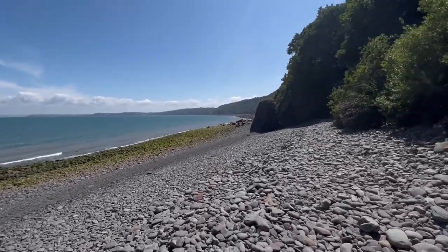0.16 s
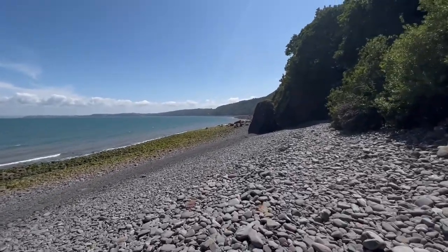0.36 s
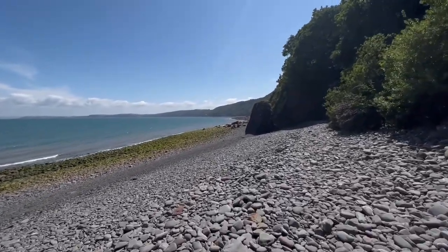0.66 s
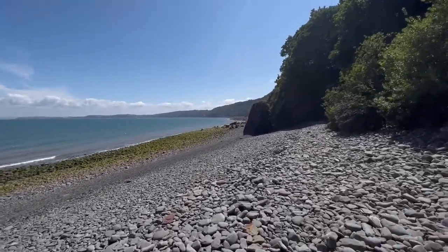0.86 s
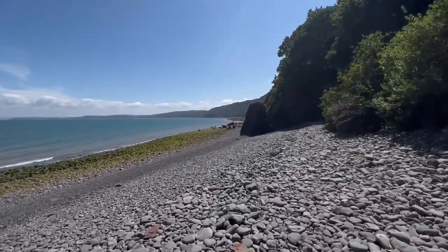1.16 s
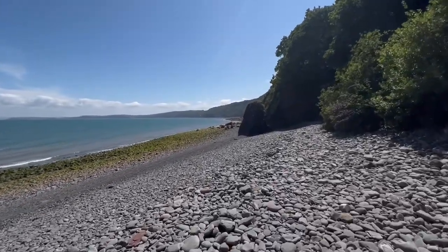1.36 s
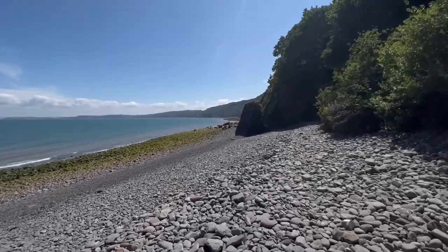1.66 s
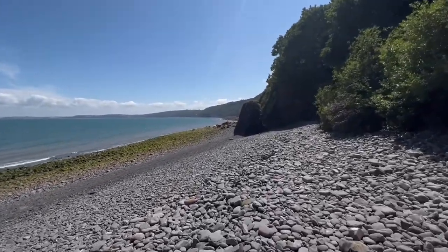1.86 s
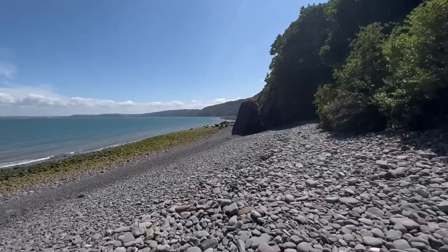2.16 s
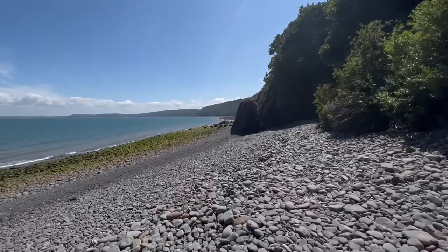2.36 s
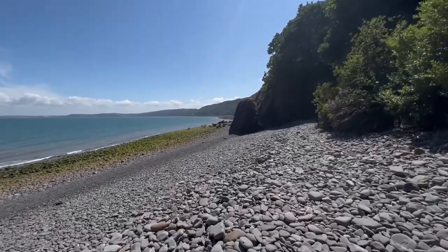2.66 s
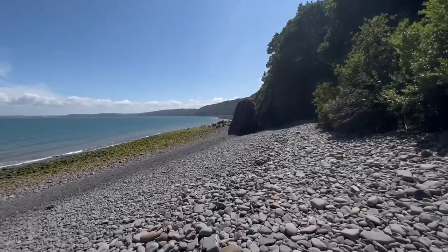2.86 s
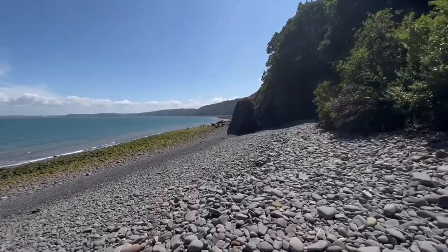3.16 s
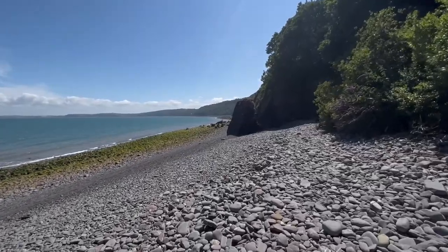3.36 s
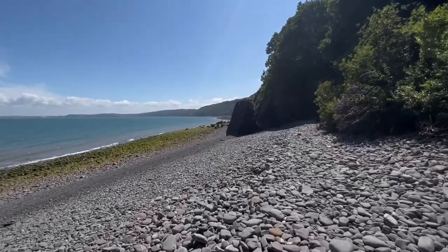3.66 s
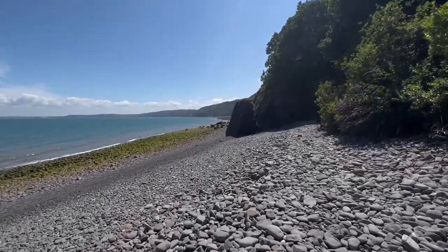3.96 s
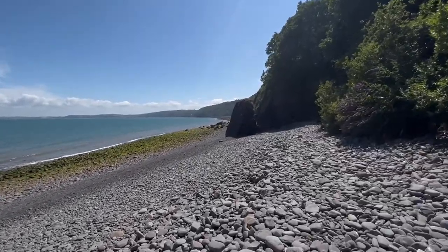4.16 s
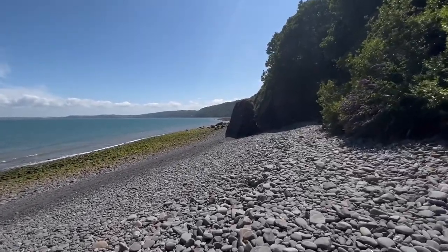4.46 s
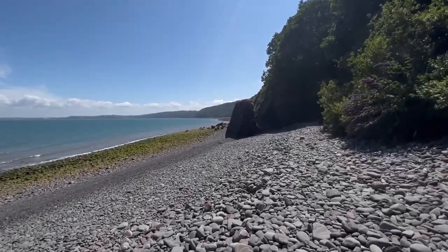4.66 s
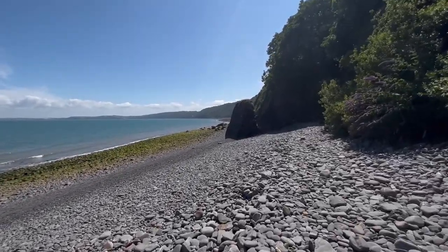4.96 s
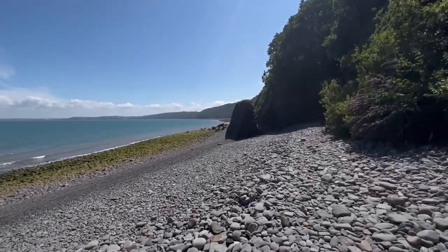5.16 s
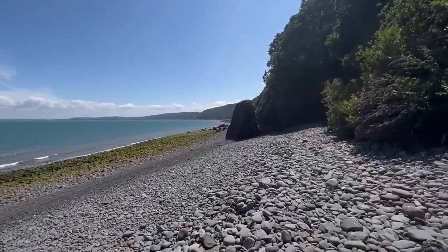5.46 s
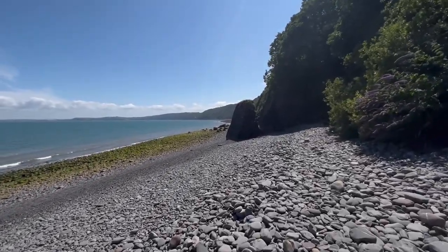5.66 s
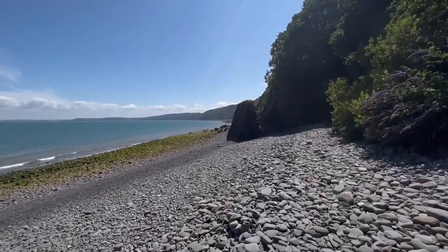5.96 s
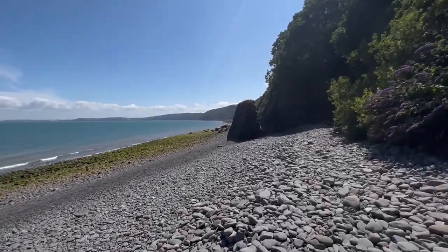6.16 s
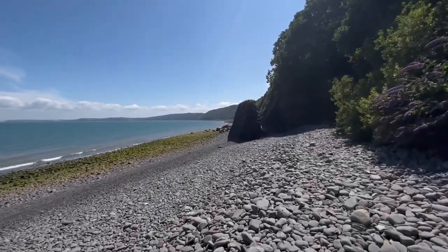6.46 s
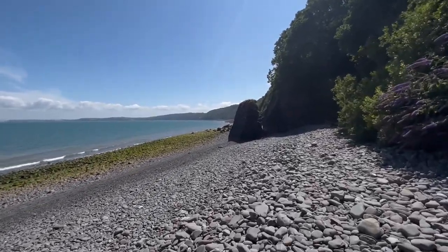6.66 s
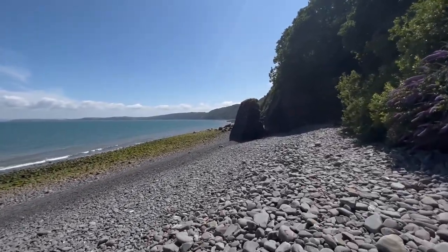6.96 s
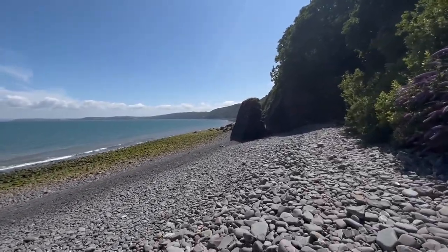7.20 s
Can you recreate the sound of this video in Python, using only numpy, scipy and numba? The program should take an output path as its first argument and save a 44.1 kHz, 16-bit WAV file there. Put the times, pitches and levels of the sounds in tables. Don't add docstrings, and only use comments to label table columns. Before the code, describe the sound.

A walker crosses an open cobble beach with a handheld microphone. Irregular clusters of hard, dry stone knocks mark each step, some bright and cracking, others dull and hollow, with little ticks and rattles between. A faint, steady sea hiss leans left and rises gently after four seconds. Gusty low-frequency wind rumbles and thumps the microphone, stronger in the second half.

```python
import sys
import numpy as np
from scipy import signal
from scipy.fft import rfft, irfft
from scipy.io import wavfile
from scipy.ndimage import uniform_filter1d
from numba import njit

SR = 44100
rng = np.random.default_rng(int(sys.argv[2]) if len(sys.argv) > 2 else 0)


def gain_from_db(level_db):
    decades = np.asarray(level_db, float) / 20
    return 10 ** decades


def output_pcm(signal):
    pcm = np.clip(np.atleast_2d(signal).T, -1, 1) * 32767
    wavfile.write(sys.argv[1], SR, np.round(pcm).astype(np.int16))


N = 323253

RIGHT_TREBLE_HZ = 8500


def along(table, hz):
    f, v = np.transpose(table)
    return np.interp(np.log(np.maximum(hz, 1)), np.log(f), v)


def curve(rows):
    s, *columns = np.transpose(rows)
    return [np.interp(np.arange(N) / SR, s, c) for c in columns]


def walk(rate_hz):
    hold = int(SR / rate_hz)
    steps = np.repeat(rng.standard_normal(N // hold + 1), hold)
    return 1.85 * uniform_filter1d(uniform_filter1d(steps, hold), hold)[:N]


def noise_bands(edges_hz, table, likeness, lag_ms, turn=0.):
    f = np.arange(N // 2 + 1) * SR / N
    left, other = rfft(rng.standard_normal((2, N))) * gain_from_db(along(table, f))
    like = likeness(f)
    lagged = left * np.exp(-2j * np.pi * f * lag_ms / 1000 - 1j * turn)
    right = like * lagged + np.sqrt(1 - like ** 2) * other
    for lo, hi in zip(edges_hz, edges_hz[1:]):
        in_band = (f >= lo) & (f < hi)
        yield np.sqrt(lo * hi), irfft(np.array([left, right]) * in_band, N)


def sea():
    # time in seconds, level in dB.
    wash = [(0.0, -38), (0.61, -41), (1.22, -40), (1.83, -42), (2.44, -40.5), (3.05, -39.5), (3.66, -37.5),
            (4.27, -36.5), (4.88, -33.5), (5.49, -33.5), (6.1, -33), (6.71, -36), (7.32, -37.5)]
    # frequency in Hz, density in dB per Hz.
    colour = [(150, -1), (250, -10.5), (543, -7), (841, 3), (1120, -3.5), (1470, -3), (1650, -6),
              (2830, -6.5), (4230, -11.5), (5730, -11), (9000, -19.5), (11400, -28), (12600, -30),
              (13700, -32), (15100, -26)]
    # frequency in Hz, left minus right in dB.
    balance = [(250, 2.5), (800, 5.), (2400, 4.5), (4400, 9.), (7500, 10.), (11000, 1.)]
    # frequency in Hz, correlation 0-1.
    alike = [(250, 0.43), (800, 0.97), (1800, 0.07), (3000, 0), (8000, 0.1), (11000, 0.44)]
    wash_db, = curve(wash)
    nearing_db = 0.58 * (np.arange(N) - N / 2) / SR
    fizz_db = -52.5 + 0.6 * (wash_db + 40) + nearing_db
    swell = walk(0.94)
    edges_hz = 200 * 2 ** np.arange(0, 6.6, .25)
    out = 0
    for hz, pair in noise_bands(edges_hz, colour, lambda f: np.clip(along(alike, f), 0, .99), lag_ms=.45):
        high = np.clip(np.log2(hz / 2000) / 1.2, 0, 1)
        db = (1 - high) * (wash_db + 11.5) + high * (fizz_db + 18.0)
        db = db + .6 * swell + .9 * walk(9) + 1.2 * walk(60)
        db = db + (hz > RIGHT_TREBLE_HZ) * nearing_db
        out = out + pair * gain_from_db(db + along(balance, hz) / 2 * np.array([[1], [-1]]))
    return out


def wind_db():
    # time in seconds, level in dB.
    lull = [(0, -38.5), (.37, -52), (.85, -41.5), (1.2, -49.5), (2.1, -41.5), (2.9, -50), (3.6, -46.5),
            (4.2, -48), (4.7, -43.5), (5.45, -50), (6.2, -45), (6.7, -57), (7.32, -41)]
    # time of peak in seconds, peak in dB, width in ms.
    gust_rows = [(.672, -31, 20), (1.34, -39, 18), (1.48, -45, 17), (1.97, -34.5, 21), (2.19, -40, 21),
                 (2.35, -34.5, 23), (2.48, -32.5, 32), (2.63, -40, 59), (3.15, -36, 87), (3.78, -37.5, 66),
                 (3.89, -34.5, 27), (4.4, -43.5, 140), (5.01, -39, 170), (5.2, -36, 157), (5.68, -39.5, 78),
                 (5.88, -34, 51), (6.03, -35.5, 120), (6.22, -36, 16), (6.37, -33.5, 96), (6.59, -36, 59),
                 (6.86, -30.5, 83), (7.05, -30.5, 54), (7.29, -35.5, 71)]
    ms = np.arange(N) * 1000 / SR
    gusts = sum(gain_from_db(2 * db) * np.exp(-((ms - 1000 * s) / width_ms) ** 2) for s, db, width_ms in gust_rows)
    return 10 * np.log10(gain_from_db(2 * curve(lull)[0]) + gusts)


@njit
def ring(start, pole, rise, left, right, n):
    out = np.zeros((2, n))
    for g in range(len(start)):
        z, gap, i = 1 + 0j, 1., start[g]
        while abs(z) > 1e-3 and i < n:
            out[0, i] += (1 - gap) ** 2 * (left[g] * z).imag
            out[1, i] += (1 - gap) ** 2 * (right[g] * z).imag
            z, gap, i = z * pole[g], gap * rise[g], i + 1
    return out


def grains(s, hz, cycles, size, pan_db, lag_ms, contact):
    turn = np.exp(2j * np.pi * rng.random(len(s)))
    pole = np.exp((2j * np.pi - np.log(1000) / cycles) * hz / SR)
    left = size * turn * gain_from_db(pan_db / 2)
    right = size * turn * gain_from_db(-pan_db / 2) * np.exp(-2j * np.pi * hz * lag_ms / 1000)
    start = np.clip(s * SR, 0, N - 1).astype(np.int64)
    contact_s = contact / hz + 0.065 / 1000
    return ring(start, pole, np.exp(-1 / SR / contact_s), left, right, N)


def thumps(count=5):
    # time in seconds, peak in dB, frequency in Hz.
    eddies = [(0.608, -22, 155), (0.614, -25, 64.5), (0.667, -25, 76.6), (5.972, -22, 150),
              (2.346, -22, 142), (3.78, -11, 258), (3.857, -16.5, 161), (4.994, -16, 108),
              (6.069, -22, 107), (6.219, -17, 98), (6.319, -16, 95), (6.382, -19, 106), (6.552, -20, 83),
              (6.81, -21, 180), (5.895, -31, 130), (7.02, -22, 90), (7.068, -21, 85)]
    s, peak_db, hz = (np.repeat(c, count) for c in np.transpose(eddies))
    follows = np.arange(len(s)) % count > 0
    when, pitch = rng.random((len(s), 2)).T * follows
    size = gain_from_db(peak_db + 9.0 - 4.0 * pitch)
    return grains(s + .012 * when, hz * 4 ** pitch, 3.6, size, pan_db=9., lag_ms=2.2, contact=.6)


def breeze():
    # frequency in Hz, density in dB per Hz.
    buffet = [(20, -34.), (35, -17.), (60, -1.), (100, 0.), (170, -3.), (280, -9.), (450, -17.),
              (900, -33.)]
    db = wind_db()
    pan_db = np.clip(4.4 + .3 * (db + 40), 0, 14)
    reach = 0.25 * (db + 40.0)
    puff = np.clip(walk(45), -1.5, 1.4)
    edges_hz = 20 * 2 ** np.arange(0, 5.6, .5)
    out = 0
    for hz, pair in noise_bands(edges_hz, buffet, lambda f: 0.76 + 0 * f, lag_ms=0.36, turn=1.13):
        out = out + pair * gain_from_db(puff * 1.3 * np.log2(hz / 30) + reach * np.log2(hz / 90))
    return out * gain_from_db(db + 21.0 + np.array([pan_db, -pan_db]) / 2) + thumps()


def stones(s, hz, cycles, size, spread_ms=0.085, contact=0.28):
    # frequency in Hz, left minus right in dB.
    shadow = [(300, 1.), (700, .5), (1300, 2.5), (2400, 6.5), (4400, 15.), (6300, 11.), (8500, 1.),
              (12000, 0.)]
    place = rng.standard_normal((len(s), 2)).T
    pan_db = along(shadow, hz) + 2.5 * place[0]
    return grains(s, hz, cycles, size, pan_db, spread_ms * place[1] - 0.003, contact)


def grit(pitch, bright_db):
    # frequency in Hz, density in dB per Hz.
    colour = [(180, -38), (300, -33), (408, -32), (539, -2), (610, -4), (1180, 2), (2300, -2), (6370, -15),
              (10100, -29.5), (12000, -138), (15600, -70), (22000, -120)]
    hz = 350 * 32 ** pitch
    treble = np.clip(np.log2(hz / 2200), 0, 1)
    return hz, gain_from_db(along(colour, hz) + (bright_db + 11.5) * treble) * hz / 1500


def foot():
    # time of full load in seconds, length in seconds, level in dB, brightness in dB.
    treads = [(.044, .09, -21.5, -7.5), (.135, .15, -24.5, -17), (.72, .16, -21, -6), (.78, .14, -22, -12),
              (1.228, .09, -33, -48), (1.33, .13, -20.5, -12), (1.93, .09, -26, -20),
              (1.968, .15, -22, -10), (2.55, .16, -21, -13.5), (3.108, .085, -17.5, -5.5),
              (3.19, .13, -30, -10), (3.77, .15, -21, -5.5), (3.892, .07, -20, -16),
              (4.405, .15, -22.5, -9), (4.516, .09, -26, -12), (5.02, .17, -27, -19),
              (5.187, .09, -31.5, -12), (5.38, .15, -28, -27), (5.578, .11, -17.5, -13),
              (5.66, .11, -16, -13), (6.25, .14, -28.5, -6), (6.822, .09, -29.5, -11),
              (6.91, .15, -20, -8.5)]
    t = np.arange(N) / SR
    press = 0
    for s, length_s, db, _ in treads:
        corners_s = [s - .45 * length_s, s, s + .55 * length_s]
        press = press + np.interp(t, corners_s, [0, gain_from_db(db), 0])
    return press, curve(treads)[2]


def grinding(rate_hz=1800, count=5):
    press, bright_db = foot()
    load = press * gain_from_db(2.67 * np.clip(walk(150), -2, 1.5))
    when, force = np.repeat(rng.random((int(rate_hz * N / SR), 2)), count, axis=0).T
    slip, pitch, luck = rng.random((len(when), 3)).T
    at = (when * N).astype(int)
    hz, size = grit(pitch, bright_db[at] - 4.5)
    size = size * load[at] * gain_from_db(-2.5 - 1.66 * np.log(0.011 + force) - 2.0 * luck)
    cycles = 10.0 * (hz / 1500) ** 0.053
    s = when * N / SR + .0012 * slip
    heard = press[at] > 2e-3
    return stones(s[heard], hz[heard], cycles[heard], size[heard])


def pings(rows):
    s, db, hz, ms = np.transpose(rows)
    return stones(s, hz, hz * ms / 1000, gain_from_db(db), spread_ms=0.013, contact=0.46)


def answering_stones():
    # time in seconds, peak in dB, ring in Hz, ring time in ms.
    answers = [(.0115, -20.5, 862, 18), (.0985, -23, 4650, 8), (.1235, -23, 3270, 8.8),
               (.7245, -27, 1200, 14), (.7395, -25, 2070, 12), (.9757, -21, 2580, 16),
               (1.3445, -22, 3100, 10), (1.9165, -18, 1020, 19), (1.9615, -20, 890, 54),
               (2.5555, -12, 2740, 10), (2.5595, -30, 4820, 8), (2.5625, -27, 1720, 12.1),
               (3.1075, -7, 2410, 10), (3.1665, -18, 1520, 18), (3.1835, -8, 2080, 8.1),
               (3.2505, -28, 2600, 8), (3.7905, -6, 2070, 9.6), (3.8045, -18, 3830, 9.8),
               (4.0105, -20, 1210, 12), (4.9815, -13.5, 2980, 9), (4.1575, -21.5, 3350, 12),
               (4.368, -20, 1380, 30), (4.377, -22, 1300, 30), (4.385, -18, 1390, 35), (4.405, -24, 3200, 10),
               (4.4165, -25, 3790, 8), (4.4165, -22, 5510, 9.4), (4.4185, -16, 2550, 13),
               (4.4185, -16, 1220, 14), (4.4575, -7, 1400, 11), (4.5325, -23, 2760, 8),
               (4.5445, -21, 2780, 9), (4.5555, -21, 1910, 11), (4.362, -10, 3320, 5.7),
               (5.0215, -10, 970, 15), (5.0755, -22, 3450, 8.9), (5.1635, -19, 3400, 8),
               (5.2095, -18, 1890, 12), (5.3585, -15, 1220, 20), (5.4155, -21, 700, 27),
               (5.5395, -8, 1350, 11), (5.6135, -23, 5600, 8), (5.6875, -2, 2580, 3.4),
               (6.1075, -20.5, 1220, 17)]
    return pings(answers)


def knocks(rows, count=80):
    s, db, ring_hz, bright_db, ms = (np.repeat(c, count) for c in np.transpose(rows))
    kind = np.arange(len(s)) % count / count
    main, settling = kind < .07, kind > .55
    creeping = kind > .88
    when, pitch, luck = rng.random((len(s), 3)).T
    pitch = (.618 * np.arange(len(s)) + .1 * pitch) % 1

    when = .55 * np.repeat(when[::8], 8) + .45 * when
    late = np.where(settling, .5 - 1.6 * np.log(1 - .98 * when), when ** 1.25)
    late = np.where(creeping, -.8 * when, late)

    hz, size = grit(pitch, bright_db - 5.1 * settling)
    like = np.exp(-(np.log2(hz / ring_hz) / .6) ** 2)
    larger_oct = np.clip(np.log2(ring_hz / hz) - .8, 0, 3)
    size = size * gain_from_db(3.57 * like - 2.8 * larger_oct + np.where(settling, -11.0, -8.0))
    hz = np.where(main, ring_hz * gain_from_db(1.5 * (pitch - .5)), hz)
    size = np.where(main, gain_from_db(-9.5), size)

    creep = gain_from_db(-11 * (0.5 + when) - 0.43 * (bright_db + 17.5))
    touch = np.where(creeping, creep, np.clip(0.68 + late / 0.41, 0, 1))
    fading_db = 2.6 * late + 6. * luck
    size = size * gain_from_db(db - fading_db + 2.0) * touch
    cycles = np.where(main, 18.0, np.where(settling, 14.0, 9.0)) * (hz / 1500) ** 0.42
    return stones(s + late * np.where(main, .6, .9) * ms / 1000, hz, cycles, size)


def with_brightness(rows, bright_db):
    return [(s, db, hz, bright_db, ms) for s, db, hz, ms in rows]


def further_knocks():
    # time in seconds, peak in dB, ring in Hz, rattle in ms.
    further_rows = [(0.016, -17, 1010, 4.6), (.039, -11, 1800, 1.9), (1.117, -37, 1000, 3.9),
                    (1.17, -27.5, 1490, 8.4), (1.399, -26, 1940, 2.2), (1.551, -26, 2600, 3.4),
                    (1.614, -30, 1490, 2.9), (1.923, -20, 3700, 3.7), (2.014, -20, 2620, 6.4),
                    (2.03, -21, 1700, 1.9), (2.044, -20, 6700, 2.9), (2.93, -29, 1790, 3.6),
                    (3.092, -7.5, 1900, 11.7), (3.236, -20.5, 2670, 1.9), (5.011, -15.5, 730, 8),
                    (5.059, -25, 1300, 4), (5.083, -18, 6040, 2.7), (5.5737, -8, 1520, 2.6),
                    (5.6882, -7, 2300, 1.5), (6.203, -22, 3600, 2.2)]
    return knocks(with_brightness(further_rows, -19.5))


def singing_pebbles():
    # time in seconds, peak in dB, ring in Hz, ring time in ms.
    notes = [(.026, -35, 5600, 8), (.0835, -15, 3660, 10), (.6925, -20.5, 8790, 15), (.6975, -14, 6430, 15),
             (.7545, -17, 8100, 11), (.7545, -32, 11700, 11), (.7845, -36, 8150, 20),
             (.7955, -40, 8100, 30), (.79, -15, 2410, 8), (.9757, -15, 2030, 16), (1.4315, -23, 3700, 12),
             (1.4315, -39, 7970, 40), (1.431, -8, 2600, 5.6), (1.902, -27, 1146, 49),
             (1.906, -26, 2000, 35), (1.924, -34, 6400, 10), (1.955, -36, 8540, 17),
             (1.987, -40, 11060, 33), (2.4575, -22.5, 5130, 9), (2.4585, -14.5, 2810, 15),
             (2.5095, -20, 3600, 12), (2.5213, -10, 5630, 9.2), (2.5335, -13, 6550, 13),
             (3.0965, -27, 1890, 14), (3.103, -13, 6660, 13), (3.1095, -18, 1560, 16),
             (3.1795, -32, 7920, 10), (3.7675, -24, 4280, 10), (3.7905, -18, 8700, 8.4),
             (3.8115, -43, 8440, 14), (3.8135, -20, 3850, 10), (3.8865, -21.5, 8830, 11),
             (3.887, -16, 3660, 11), (4.4125, -36, 11540, 16), (4.4585, -21, 3120, 10),
             (4.9805, -17, 7840, 11), (4.9805, -5.5, 5490, 4.4), (4.981, -12.5, 4160, 12),
             (5.5385, -21, 6890, 11), (5.574, -6, 2400, 4.5), (5.6045, -16, 6340, 11),
             (5.6045, -13, 3860, 15), (5.6875, -17, 1720, 10), (6.1905, -21, 3620, 8.8),
             (6.8118, -23, 8200, 18), (6.8112, -1, 2600, 8), (6.8215, -26, 5030, 13),
             (6.8805, -20, 5100, 12), (6.9205, -19.5, 6750, 10), (6.829, -26, 2900, 8)]
    return pings(notes)


def trodden_stones():
    # time in seconds, peak in dB, ring in Hz, rattle in ms.
    clacks = [(.0398, -6.5, 2080, 10.3), (.0809, -11, 1530, 16), (.0977, -21, 1570, 14),
              (.1498, -15, 2600, 9.1), (.172, -18, 1480, 3.3), (.7542, -2.5, 3270, 3.3),
              (1.2714, -15, 1770, 2.64), (1.3606, -15, 2490, 3.7), (1.4308, -10, 1250, 7),
              (2.0486, -17.5, 1859, 7.7), (2.4576, -7.5, 1660, 7.8), (2.548, -7.5, 1720, 16.7),
              (2.5733, -6.5, 2900, 5.3), (3.0823, -15, 3050, 4.3), (3.73, -13.5, 3757, 3.1),
              (3.7495, -8.5, 1400, 6.8), (3.887, -7, 1360, 4.55), (3.9915, -15.5, 1710, 2.96),
              (4.1566, -17.5, 1410, 5.1), (4.4678, -8.5, 1420, 3.8), (5.068, -10.5, 1207, 9.8),
              (5.186, -12, 1380, 5.2), (5.5755, -2, 2270, 7.8), (5.934, -17.5, 2180, 2.6),
              (5.9462, -13.5, 2450, 5.5), (5.9991, -16.5, 1990, 2.5), (6.2594, -5.5, 1770, 8.2),
              (6.903, -13, 3320, 11), (6.9214, -4.5, 2350, 10.6)]
    taps = [(.0588, -4, 1980, 3.8), (.091, -9, 1660, 4.5), (.5689, -16, 2300, 5.7), (.709, -13, 1040, 6.4),
            (1.207, -17.5, 1190, 18), (1.2426, -16, 1667, 7.9), (1.487, -20, 2180, 7.4),
            (1.9077, -15, 1970, 23), (2.2975, -23, 1720, 4.8), (2.4921, -15, 3070, 11),
            (2.6155, -22, 1655, 4.5), (3.18, -6, 1130, 7.9), (4.0092, -13, 1240, 8.8),
            (4.0832, -20.5, 2530, 2.6), (4.1176, -17.5, 770, 5.5), (4.32, -15, 1360, 4.2),
            (4.4942, -14, 2930, 2.2), (4.5147, -27, 1560, 3), (4.6281, -17, 2870, 5.5),
            (5.1644, -10, 1610, 4.1), (5.357, -15, 1240, 20.5), (5.6955, -4.5, 2080, 3.8),
            (5.7689, -15, 1860, 7.4), (6.2094, -17, 1107, 4.8), (6.897, -5.5, 3480, 9.2)]
    clunks = [(.6538, -15, 1752, 19), (.8859, -21, 1320, 4.5), (.9755, -17, 2640, 5.9),
              (1.3232, -18, 1650, 5.4), (1.443, -15, 1500, 8.3), (1.533, -25, 1946, 15),
              (1.5715, -12, 2940, 11), (3.041, -15.5, 1650, 5), (3.216, -14.5, 1810, 2.4),
              (3.7688, -9, 1900, 3.2), (4.4832, -11, 1600, 3), (4.5922, -19, 1800, 4.4),
              (5.0205, -7, 1190, 9.2), (5.3395, -12.5, 1470, 2.5), (5.3808, -33.5, 1370, 4.8),
              (5.4242, -16, 1320, 5.1), (5.518, -12, 960, 9), (5.6869, -7.5, 1810, 3.8),
              (6.6763, -24, 805, 9.1), (6.7971, -11.5, 2660, 3.4), (.1235, -22, 3200, 3.1),
              (4.366, -27, 1360, 25.5)]
    cracks = [(.6872, 2.5, 2150, 12.1), (.8, -14, 2780, 14.5), (1.3045, -20.5, 1360, 3.4),
              (2.5206, 0.32, 2000, 9.4), (2.5317, -5, 1860, 6.7), (3.0714, -14, 2265, 2.5),
              (3.1072, -1.5, 2060, 6), (3.1576, -17.5, 3290, 5.8), (3.7124, -16, 1630, 6.5),
              (3.7902, -6, 1961, 5.4), (3.8052, -12.5, 1400, 0.71), (3.8219, -17, 2930, 5.6),
              (3.8694, -13, 2477, 2.6), (4.357, -5.5, 1490, 6.5), (4.3955, -2, 3620, 4.2),
              (4.4258, -5, 1690, 1.5), (4.4563, -9.5, 3000, 6.2), (4.6418, -18.5, 850, 13),
              (4.9806, -24, 4300, 2.16), (5.471, -18.5, 1270, 5.4), (5.5395, -5.5, 3000, 2.9),
              (5.543, -11, 2950, 4.8), (5.603, -4.5, 1320, 7.6), (5.6123, -6.5, 2730, 6),
              (5.649, -7, 2830, 15.5), (6.1631, 0, 1550, 10.9), (6.8106, -12, 2738, 2.5),
              (6.8715, -12, 1860, 6.2), (6.8808, -30, 1830, 2.6), (6.9629, -26, 1880, 7.4)]
    ticks = [
        (1.345, -17.5, 4370, 5.2),
        (3.841, -20, 5900, 5),
        (5.0755, -24, 4460, 1.7),
        (4.9806, -10, 5700, 2.37),
        (5.728, -21, 4620, 2),
        (6.1625, -11, 2940, 2.6),
        (6.812, -14, 8460, 2.9),
    ]
    rows = with_brightness(cracks, -8) + with_brightness(clacks, -14.5) + with_brightness(taps, -19.5)
    return knocks(rows + with_brightness(clunks, -27) + with_brightness(ticks, -8.5))


def dry_snaps():
    # time in seconds, peak in dB, ring in Hz, ring time in ms.
    snaps = [
        (3.8695, -8, 2500, 4.3),
        (4.0495, -28, 5000, 2),
        (4.5135, -19, 2002, 3.5),
        (4.627, -19, 2200, 4),
        (4.6415, -14, 3020, 3),
        (4.684, -19, 2000, 4.6),
    ]
    return pings(snaps)


def open_right_treble(x, tilt_db=13):
    top = signal.sosfilt(signal.butter(2, RIGHT_TREBLE_HZ, "high", fs=SR, output="sos"), x)
    return x + (gain_from_db(tilt_db / 2 * np.array([[-1], [1]])) - 1) * top


def scatter(x, t60_ms=62.0, level_db=-11.0):
    t = np.arange(1, int(.06 * SR)) / SR
    decay = np.exp(-np.log(1000) * t * 1000 / t60_ms) * (t > .001)
    tail = rng.standard_normal((2, len(t))) * decay
    tail = tail / np.sqrt(np.sum(tail ** 2, axis=1, keepdims=True))
    return x + gain_from_db(level_db) * signal.fftconvolve(x, tail, axes=1)[:, :N]


def scene():
    feet = grinding() + answering_stones() + further_knocks() + singing_pebbles() + trodden_stones()
    return sea() + breeze() + scatter(open_right_treble(feet)) + dry_snaps()


def top_cut(x):
    return signal.sosfilt(signal.butter(12, 17130, fs=SR, output="sos"), x)


def record(dry):
    # frequency in Hz, width in Hz, share added.
    port = [
        (10460, 1500, -0.65),
        (11500, 780, 0.32),
        (13700, 2000, -1.5),
        (15050, 880, 4.5),
    ]
    rounded = .95 * np.tanh(dry / .95)
    soft = signal.sosfilt(signal.butter(4, 11500, fs=SR, output="sos"), rounded)
    for hz, width_hz, share in port:
        soft = soft + share * signal.lfilter(*signal.iirpeak(hz, hz / width_hz, fs=SR), soft)
    soft = signal.sosfilt(signal.ellip(8, .2, 60, 15800, fs=SR, output="sos"), soft)
    return top_cut(soft)


dry = scene()
out = record(dry)
output_pcm(out)
```